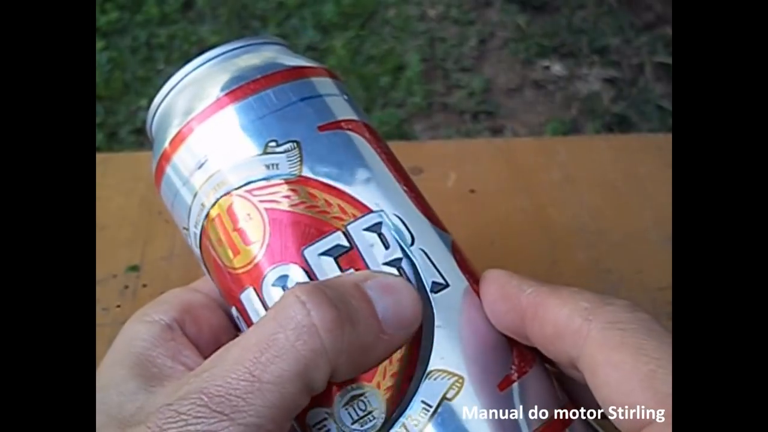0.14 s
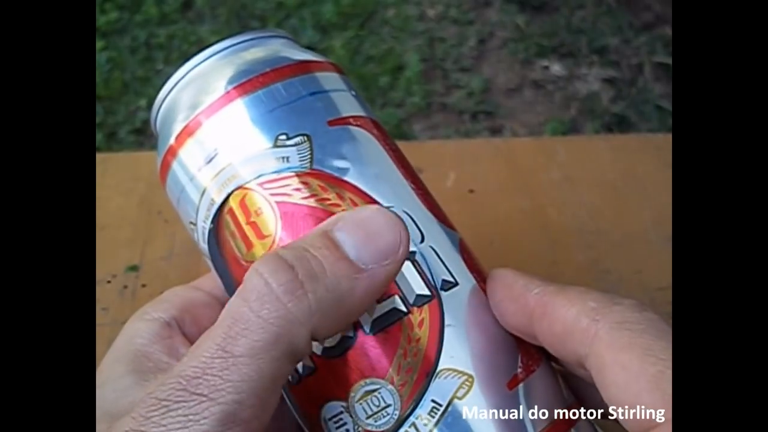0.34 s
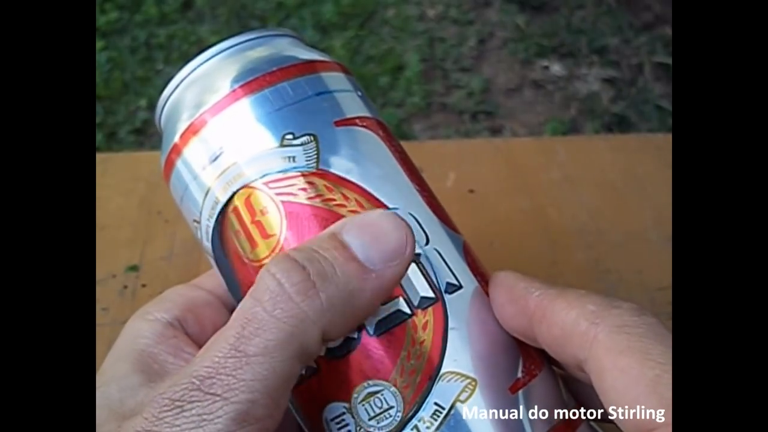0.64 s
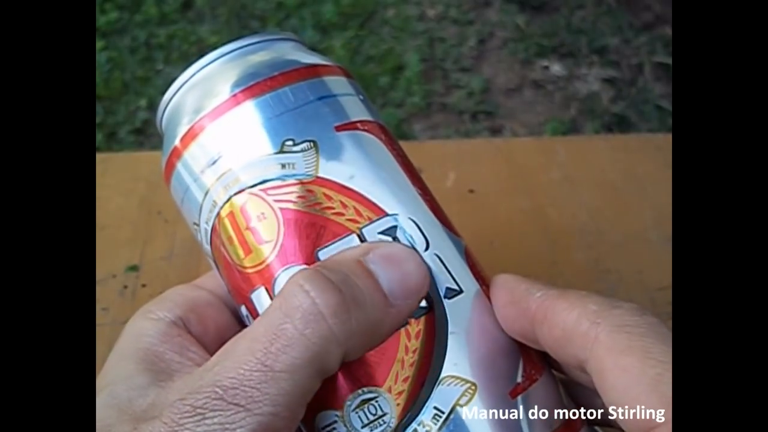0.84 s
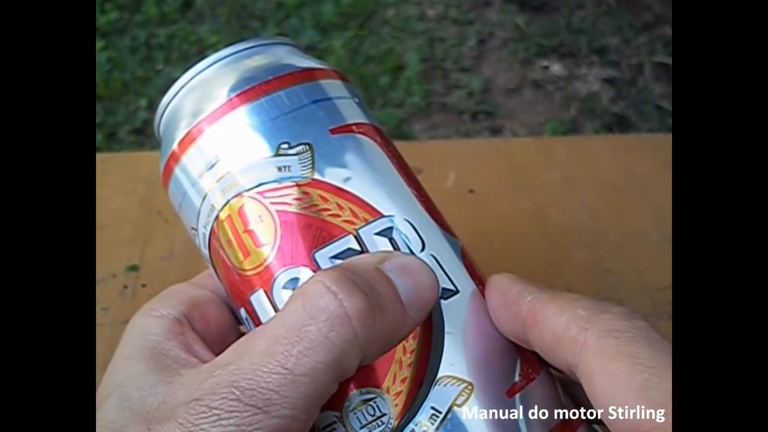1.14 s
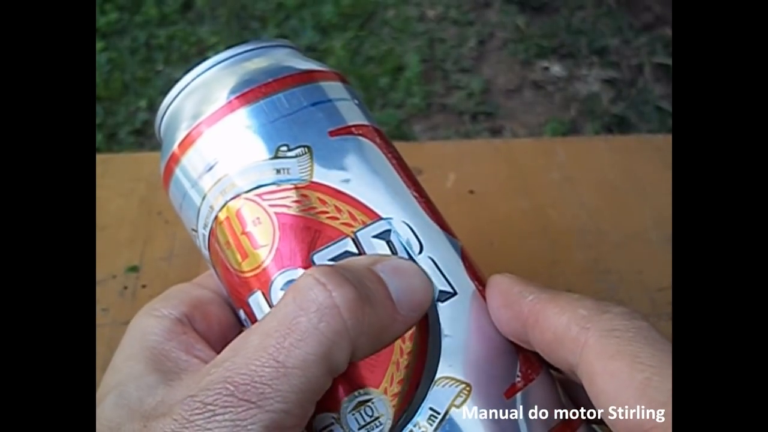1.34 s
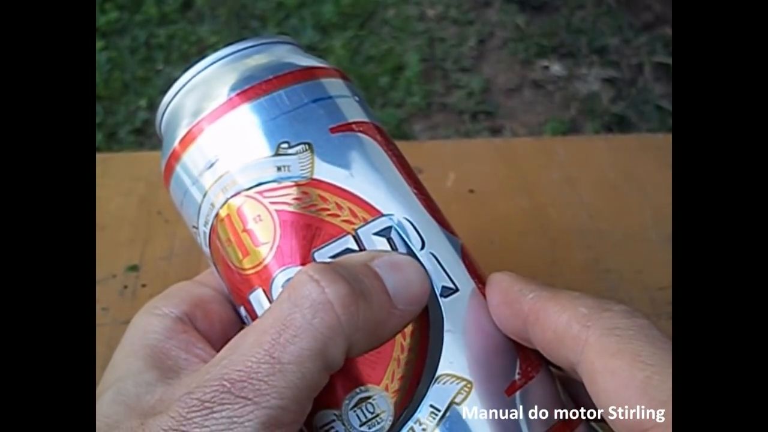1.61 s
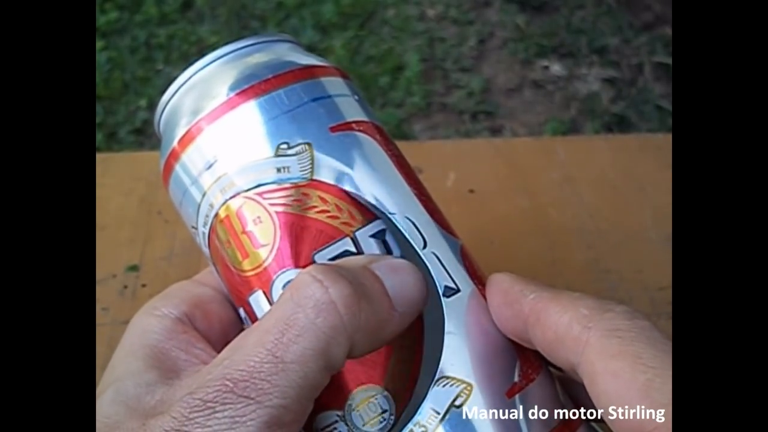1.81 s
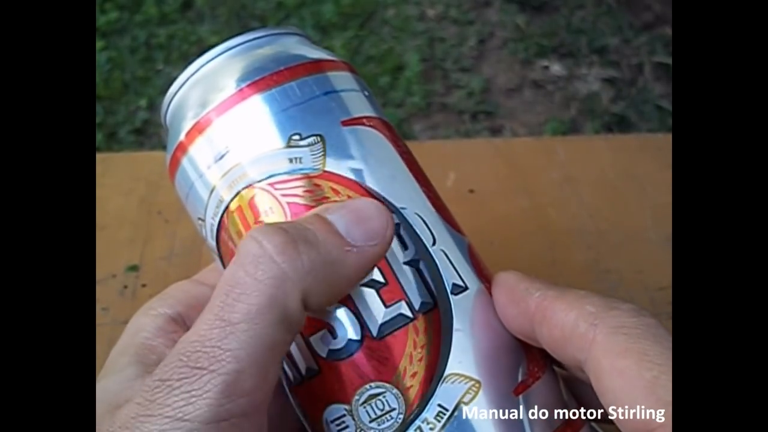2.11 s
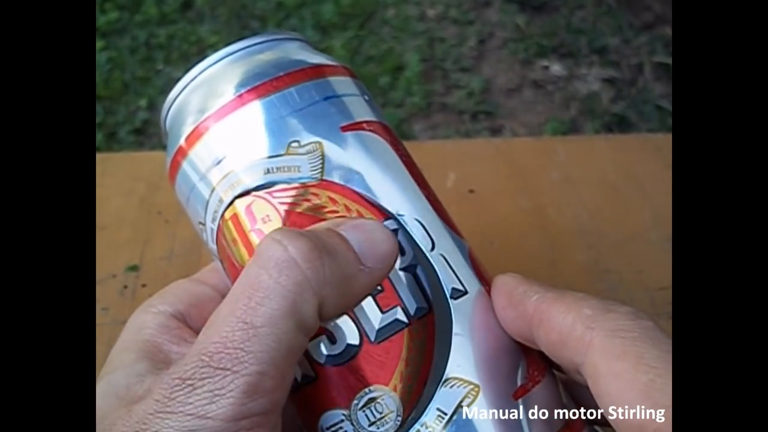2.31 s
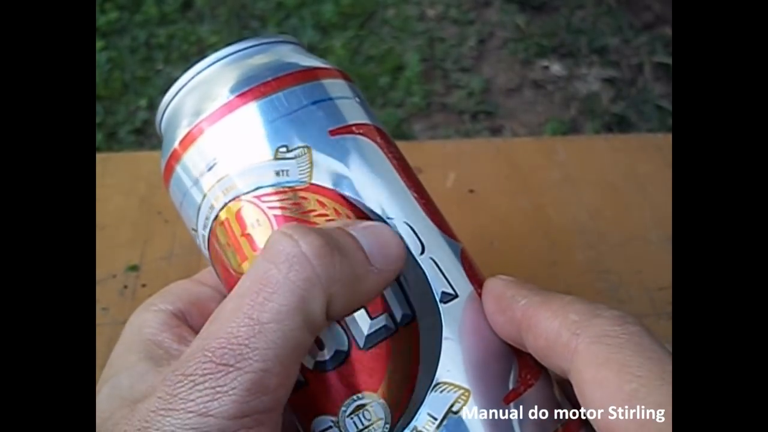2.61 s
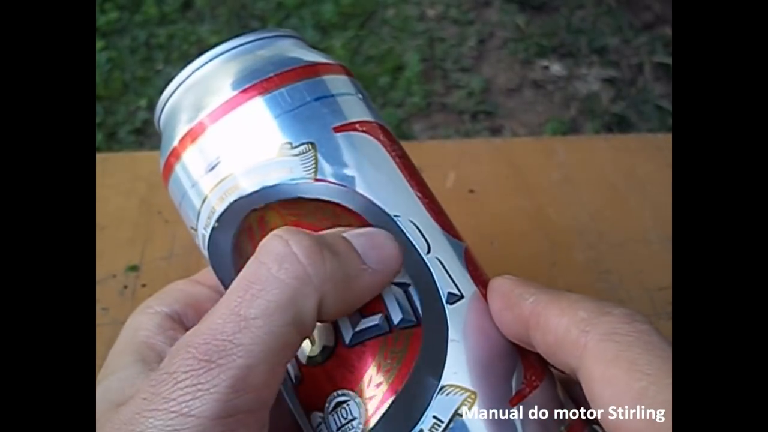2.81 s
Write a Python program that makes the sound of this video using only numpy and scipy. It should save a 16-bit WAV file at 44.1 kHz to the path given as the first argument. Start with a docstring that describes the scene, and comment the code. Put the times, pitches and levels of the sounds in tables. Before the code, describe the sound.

Empty aluminium can crackles and pops irregularly as thumbs flex its thin wall, close up outdoors

```python
"""Outdoors, close to a small camera, thumbs flex an empty aluminium can and push a cut disc out of its wall.
Dents pop through with a few sinking swings, creases snap and the cut edges scrape past each other.
All of these ring the can: separate fading tones for the wall and the air inside, noise for the thin sheet.
Fine crackle, soft rubbing skin and the ringing freed disc join in, with a faint echo.
Behind lie a low rumble, a faint hum and hiss. The narrow-band microphone overloads on the loudest hits."""
import sys
import numpy as np
from scipy import signal
from scipy.fft import rfft, irfft
from scipy.io import wavfile

SR = 44100
rng = np.random.default_rng(int(sys.argv[2]) if len(sys.argv) > 2 else 0)


def output_pcm(signal):
    """Save a mono or channel-first signal as 16-bit PCM at the path in sys.argv[1].

    Samples are clipped to [-1, 1] before scaling.
    """
    pcm = np.clip(np.atleast_2d(signal).T, -1, 1) * 32767
    wavfile.write(sys.argv[1], SR, np.round(pcm).astype(np.int16))


N = 130095  # length in samples
HIT_S = 0.01  # the level of a single hit is its power averaged over this many seconds


def amp(db):
    """Turns decibels into a gain."""
    return 10 ** (np.asarray(db) / 20)


def evened(x):
    """Scales a sound to an rms of 1."""
    return x / np.sqrt(np.mean(x ** 2) + 1e-20)


def read(points, hz):
    """Reads a curve of (Hz, value) points on a log-frequency axis."""
    f, value = np.transpose(points)
    return np.interp(np.log(hz + 1), np.log(f + 1), value)


def add(mix, s, sound):
    """Mixes a sound in at time s, cutting off what runs past the end."""
    part = mix[max(round(s * SR), 0):][:len(sound)]
    part += sound[:len(part)]


def noise(points):
    """Steady noise of rms 1, shaped to the given spectrum."""
    hz = np.fft.rfftfreq(N, 1 / SR)
    spectrum = rfft(rng.standard_normal(N)) * amp(read(points, hz))
    return evened(irfft(spectrum, N))


def drift(rate_hz):
    """Random wander of rms 1, kept mostly slower than rate_hz."""
    hz = np.fft.rfftfreq(N, 1 / SR)
    spectrum = rfft(rng.standard_normal(N)) * np.exp(-(hz / rate_hz) ** 2)
    return evened(irfft(spectrum, N))


def low_pass(x, hz, size):
    """Removes what lies above hz; a larger size cuts more steeply."""
    taps = signal.firwin(size, hz, window=("kaiser", 8), fs=SR)
    return np.apply_along_axis(signal.oaconvolve, -1, x, taps, "same")


# Borders in Hz between four neighbouring bands: bass, near 1 kHz, middle and treble.
BAND_EDGES = [250, 600, 1450, 2800, 5800]


def voiced(x, length, db, bass_db, middle_db, treble_db, size=8192):
    """Filters a sound to the wanted level in each band without any sound before its start."""
    z, hz = rfft(x, size), np.fft.rfftfreq(size, 1 / SR)
    bands = list(zip(BAND_EDGES, BAND_EDGES[1:]))
    centres = np.mean(bands, 1)
    wanted = db + np.array([bass_db, 0, middle_db, treble_db])
    gains = np.zeros(len(bands))
    for _ in range(2):  # the bands affect each other, so correct twice
        shaped = z * amp(read(list(zip(centres, gains)), hz))
        power = abs(shaped) ** 2 * 2 / (size * length * SR)
        levels = [10 * np.log10(power[(hz > lo) & (hz < hi)].sum() + 1e-20) for lo, hi in bands]
        gains = gains + wanted - levels
    # folding the cepstrum forward gives a filter that acts only after each impulse
    cepstrum = irfft(np.log(amp(read(list(zip(centres, gains)), hz))))
    cepstrum[1:size // 2] *= 2
    cepstrum[size // 2:] = 0
    return irfft(z * np.exp(rfft(cepstrum)))


def pressed(t, db_per_ms):
    """Extra decay under the thumb; negative damping counts as none."""
    return amp(-max(db_per_ms, 0) * t * 1000)


# Lowest strong resonance, rising as the disc lifts away. Each row: time in seconds, pitch in Hz.
CAVITY_HZ = [(0, 962), (2.62, 975.6), (2.76, 1159)]
# Ringing tones of the held can.
# Each row: pitch in Hz, strength in dB relative to the other tones, time to fade by 60 dB in seconds.
CAN_MODES = [(770, -15, .04), (1218, -2.5, 0.057), (1360, -9.5, 0.068), (1745, -7, .05), (1887, -3, 0.046),
             (2063, -5.5, 0.039), (2230, -9.5, 0.061), (2890, -7.5, 0.045), (3694, -9, 0.039),
             (4480, -10.5, 0.057), (5250, -7, 0.099), (5637, 3.5, 0.015)]
CAVITY_DB, CAVITY_T60_S = 2, 0.038
MODE_SPREAD_DB = 3  # each spot on the wall favours other modes
SHEET_DB, SHEET_T60_S = 3.5, 0.014  # dense, quickly damped modes of the thin sheet
TAIL_DB, TAIL_T60_S = -23, 0.1  # weaker, longer clatter that the thumb does not damp


def can_ring(s, damping=0, size=5000):
    """One impulse at time s rings separate modes over the clatter of the sheet; damping in dB/ms."""
    t = np.arange(size) / SR
    cavity = (np.interp(s, *np.transpose(CAVITY_HZ)), CAVITY_DB, CAVITY_T60_S)
    modes = np.zeros(size)
    for hz, db, t60 in [cavity, *CAN_MODES]:
        fade = amp(db + MODE_SPREAD_DB * rng.standard_normal() - 60 * t / t60)
        modes += fade * rng.choice([-1, 1]) * np.sin(2 * np.pi * hz * t)
    clatter = evened(low_pass(rng.standard_normal(size), 8000, size=31))
    sheet = clatter * amp(SHEET_DB - 60 * t / SHEET_T60_S)
    tail = clatter * amp(TAIL_DB - 60 * t / TAIL_T60_S)
    return (modes + sheet) * pressed(t, damping) + tail


# Dents flipping through.
# Each row: start in seconds, base level near 1 kHz in dB, middle and treble in dB relative to that,
# low, middle and high pitch in Hz at full swing, time to full swing in seconds.
POPS = [ (0.257, -32, 4.5, 3.5, 1024, 2030, 4470, 0.00071),
        (0.2676, -28.5, 7.5, -2.5, 1070, 1878, 2790, 0.00068),
        (.2738, -40.5, 4.5, -2, 1250, 1920, 2920, .0006),
        (0.2907, -32.5, 6.5, 1.5, 1170, 1700, 5200, .0008), (0.3076, -28, 5, -7, 1020, 1990, 2740, 0.001),
        (.597, -35, -6.5, -18.5, 1006, 1910, 3030, 0.0013),
        (0.6043, -36.5, -7.5, -18, 987, 2020, 3420, 0.0039),
        (0.9629, -31.5, -4, -15, 1067, 1876, 2820, 0.0012), (.97, -35, -6, -14, 986, 1780, 2850, 0.0028),
        (1.6242, -24, -3, -9.5, 1090, 1570, 3330, 0.00096), (1.911, -26.5, 4, 6, 914, 1820, 3480, 0.0011),
        (1.9134, -25.5, -5.5, 3.5, 1007, 2520, 4390, 0.003),
        (2.085, -18.5, -10.5, -9.5, 1006, 1930, 2620, 0.0013),
        (2.0902, -25.5, -15, -16, 1174, 1880, 4170, .0013),
        (2.3879, -34.5, -14.5, -26, 696, 1520, 3090, 0.0027), (2.39, -38, -11, -26, 990, 2020, 2810, 0.003),
        (2.605, -35, -13.5, -23, 967, 1766, 2950, 0.0039),
        (2.8422, -25.5, -5.5, -5.5, 1097, 2510, 3320, 0.003),
        (2.8511, -30, -16, -3, 1140, 2310, 3030, 0.00084), (2.861, -23, 0.5, -7, 1356, 2355, 3200, 0.0016),
        (2.8654, -25.5, 0.5, -11, 1150, 1540, 4600, 0.0024),
        (2.8858, -21, -2, -8.5, 1405, 1732, 4370, 0.0013), (2.8888, -28, 7.5, 7, 963, 2775, 3080, 0.0024),
        (2.8904, -20.5, -1.5, -2.5, 970, 1664, 3850, 0.0024)]
SWING_SHAPE, SAG_OCTAVES_PER_S = 1.4, 9  # each flip swells and dies while its pitch sinks
FLIP_DB, POP_CAN_DB = -6, -5  # shares of the flip and of the can's ring in one layer
POP_TOP_DB = -3.5  # weakens the flip's high pitch and lifts the ring's treble by as much
POP_DAMPING, POP_BASS_DB = 0.61, -16.5  # dB/ms; bass relative to the ring near 1 kHz


def pops():
    """A dent flips through: a few clean swings at three sinking pitches, which leave the can ringing."""
    out = np.zeros(N)
    for s, db, middle_db, treble_db, *pitches, swing_s in POPS:
        ring = can_ring(s, POP_DAMPING)
        t = np.arange(len(ring)) / SR
        swing = (t / swing_s * np.exp(1 - t / swing_s)) ** SWING_SHAPE
        phase = 2 * np.pi * np.cumsum(2 ** (-SAG_OCTAVES_PER_S * (t - swing_s))) / SR
        pitch_db = [0, middle_db, treble_db + POP_TOP_DB]
        flip = swing * sum(amp(level) * np.sin(hz * phase) for hz, level in zip(pitches, pitch_db))
        low_pitch_rms = np.sqrt(np.sum(swing ** 2) / (2 * HIT_S * SR))
        add(out, s, amp(db + FLIP_DB) * flip / low_pitch_rms)
        ring = voiced(ring, HIT_S, db + POP_CAN_DB, POP_BASS_DB, middle_db, treble_db - POP_TOP_DB)
        add(out, s, ring)
    return out


# Creases snapping.
# Each row: start in seconds, level near 1 kHz in dB, middle and treble in dB relative to that,
# pitch of the buckling patch in Hz, thumb damping in dB per millisecond (below zero means none).
SNAPS = [ (.046, -51.5, -8.5, -24, 1050, 9), (0.076, -52.5, 1, -4.5, 1940, -1.5),
         (0.09, -43, -9, -8, 973, -0.5), (.176, -59.5, 5.5, 3, 980, 0), (0.21, -41.5, -3, -12.5, 1020, 0),
         (.2495, -41.5, 9.5, -2, 2050, 0), (.281, -44, 6, 0, 1950, 4), (0.285, -40.5, 1.5, -1, 1400, 3.5),
         (0.2885, -38, 5, -3.5, 1900, 3.5), (.3, -39.5, 6.5, -8.5, 1908, -3.5),
         (.3172, -48, 6, -9.5, 2000, 4), (.404, -54.5, 6.5, -10.5, 1870, -0.5),
         (0.409, -49, -5.5, -10.5, 1100, -2), (0.444, -56, -0.5, -3.5, 910, 0),
         (.6035, -37.5, 2.5, -3.5, 1840, 0), (0.8232, -43, 1, -9.5, 2000, 0.5),
         (.829, -48.5, -3.5, -11.5, 1000, 10), (0.9466, -50.5, -2, -6, 1110, -4.5),
         (1.5773, -41.5, 14, 13, 2010, 1.5), (1.5851, -38, 11, 4.5, 1995, 0.3),
         (1.6199, -40.5, 5.5, 6, 2300, 3), (1.9429, -33.5, 5.5, 1.5, 1970, 1),
         (1.9506, -30.5, -3, 0.5, 940, 0), (1.954, -30, -0.5, 0.5, 1790, 1.5),
         (1.9575, -32, 3.5, 2, 1823, 2.5), (1.961, -29.5, -1.5, 3, 987, 7.5),
         (1.9638, -32, -2.5, 1, 1096, 3.5), (2.3, -52, 0, -5.5, 2010, -0.5),
         (2.332, -49.5, 4.5, -8.5, 1877, 3.5), (2.337, -46, 3, -6, 1845, 0.2),
         (2.414, -46.5, -3, -11, 1900, .4), (2.616, -40, -6.5, -16, 983, 1.5),
         (2.667, -54, 4.5, 4, 2240, -1), (2.702, -49, -5, -9, 1000, -6), (2.724, -54.5, 8, 1, 2000, 1.5),
         (2.7773, -37, -4, -11, 1150, -1.5), (2.8488, -36.5, 3, -2.5, 1200, 3),
         (2.878, -27, 2, -6, 1950, 2)]
PATCH_DB, PATCH_T60_S = 8.5, 0.027
SNAP_BASS_DB = -18  # relative to the ring near 1 kHz


def snaps():
    """A crease gives way at once, twangs at its own pitch and rings the can."""
    out = np.zeros(N)
    for s, db, middle_db, treble_db, hz, damping in SNAPS:
        ring = can_ring(s, damping)
        t = np.arange(len(ring)) / SR
        fade = amp(PATCH_DB - 60 * t / PATCH_T60_S) * pressed(t, damping)
        patch = fade * np.sin(2 * np.pi * hz * t)
        add(out, s, voiced(ring + patch, HIT_S, db, SNAP_BASS_DB, middle_db, treble_db))
    return out


# Cut edges scraping.
# Each row: start in seconds, length in seconds, level near 1 kHz in dB,
# then bass, middle and treble in dB relative to that.
SCRAPES = [(.06, 0.033, -54.5, 1, -5.5, -4.5), (0.246, 0.016, -40, -8.5, 7.5, 4),
           (0.267, 0.02, -43.5, -12, 6.5, 2.5), (0.317, 0.0093, -47, -20, -4, -3),
           (0.856, 0.016, -54, -13, -5, -5.5), (1.61, 0.0068, -42.5, -4, 7, -10),
           (1.9394, 0.014, -35.5, -20.5, 3.5, 2.5), (1.952, 0.013, -34, -21, 3.5, 4),
           (2.162, 0.014, -56.5, -13, 5, 0.5), (2.572, 0.054, -54, -9.5, -5.5, -21.5),
           (2.839, 0.018, -30.5, -37, 2, -1), (2.866, 0.013, -28.5, -22, 1, -2.5)]
SLIPS_PER_S, SLIP_SPREAD_DB = 1400, 4
SCRAPE_DAMPING = 0.83  # dB/ms


def scrapes():
    """The cut edges stick and slip in a dense run of tiny impulses, each ringing the can."""
    out = np.zeros(N)
    for s, length, *levels in SCRAPES:
        count = max(round(length * SR), 2)
        happens = rng.random(count) < SLIPS_PER_S / SR
        strength = amp(SLIP_SPREAD_DB * rng.standard_normal(count))
        slips = happens * strength * rng.choice([-1, 1], count)
        slips[0] = 1  # every scrape starts with a slip
        ringing = signal.fftconvolve(slips, can_ring(s, SCRAPE_DAMPING))
        add(out, s, voiced(ringing, length, *levels))
    return out


# Spells of fine crackle under the thumbs. Each row: start in seconds, end in seconds.
FLEXING = [(.02, .11), (0.409, .48), (.82, .88), (2.389, 2.44), (2.571, 2.8)]
CRACKLE_PER_S, CRACKLE_DB, CRACKLE_SPREAD_DB = 130, -66, 4.5


def crackle():
    """Very small ticks at random moments ring the can while the wall is under strain."""
    out = np.zeros(N)
    for start, end in FLEXING:
        count = max(round((end - start) * CRACKLE_PER_S), 0)
        for s in rng.uniform(start, end, count):
            ring = can_ring(s)
            level = amp(CRACKLE_DB + CRACKLE_SPREAD_DB * rng.uniform(-0.93, 1))
            add(out, s, ring / np.sqrt(np.sum(ring ** 2) / (HIT_S * SR)) * level)
    return out


# Skin sliding on the wall.
# Each row: start in seconds, length in seconds, level in dB before the swell, centre pitch in Hz.
RUBS = [(0.419, .06, -59.5, 2900), (0.709, .11, -61.5, 1500), (1.221, 0.18, -62, 1500),
        (1.73, 0.045, -65, 3300), (2.558, 0.22, -67, 1700)]
RUB_GRAIN_DB, RUB_WIDTH_OCTAVES = 3, 0.34


def rubs():
    """Skin slides softly over the painted metal: grainy noise around one pitch swells and fades."""
    out, hz = np.zeros(N), np.fft.rfftfreq(N, 1 / SR)
    for s, length, db, centre_hz in RUBS:
        grains = rng.standard_normal(N) * amp(RUB_GRAIN_DB * drift(150))
        octaves = np.log2((hz + 1) / centre_hz)
        band = np.exp(-.5 * (octaves / RUB_WIDTH_OCTAVES) ** 2)
        rub = evened(irfft(rfft(grains) * band, N))
        count = max(round(length * SR), 2)
        swell = np.sin(np.linspace(0, np.pi, count))
        add(out, s, amp(db) * rub[:count] * swell)
    return out


# Ringing tones of the disc once it springs free.
# Each row: pitch in Hz, starting peak level in dB, time to fade by 60 dB in seconds.
DISC_MODES = [(809, -41, 0.4), (936, -33, 0.12), (950, -49, .08), (1195, -33.5, 0.15), (1410, -33, 0.13),
              (1830, -32, 0.18), (2560, -52, 0.087), (3090, -35, .1), (3840, -40, 0.11), (4000, -33, 0.087),
              (4320, -39, 0.33)]
FREED_S = 2.890
SHIMMER_DB, SHIMMER_T60_S = -28.5, 0.23


def freed_disc():
    """The loose disc rings in fading tones under a fading shimmer of noise."""
    out, t = np.zeros(N), np.arange(SR // 4) / SR
    ring = np.zeros(len(t))
    for hz, db, t60 in DISC_MODES:
        ring += amp(db - 60 * t / t60) * np.sin(2 * np.pi * (hz * t + rng.random()))
    shimmer = rng.standard_normal(len(t)) * amp(SHIMMER_DB - 60 * t / SHIMMER_T60_S)
    add(out, FREED_S, ring + shimmer)
    return out


ECHO_DB, ECHO_T60_S = -32.5, 0.22  # faint return from table and yard


def echo(x):
    """A faint, short outdoor tail: the sound smeared by fading noise."""
    t = np.arange(SR // 2) / SR
    tail = rng.standard_normal(len(t)) * amp(-60 * t / ECHO_T60_S)
    return amp(ECHO_DB) * signal.fftconvolve(x, tail / np.linalg.norm(tail))[:N]


# Spectrum of the distant rumble. Each row: pitch in Hz, relative strength in dB per Hz.
RUMBLE = [(10, -14.5), (24, -1.5), (44, 0.5), (56, -7.5), (70, -1.5), (96, -10.5), (112, -11.5), (130, -11),
          (175, -14), (200, -22), (300, -33.5), (600, -72.5)]
# Tones of the hum. Each row: average pitch in Hz, level in dB before the swells below.
HUM = [(44, -51), (113, -59), (150, -46.5)]
# Spectrum of the soft hiss. Each row: pitch in Hz, relative strength in dB per Hz.
AIR = [(100, -5), (250, 1), (450, -4), (800, -6), (1300, -10), (1900, -11.5), (2400, -14), (4000, -17.5),
       (5700, -16.5)]
# Gain of the whole background, which dips briefly. Each row: time in seconds, gain in dB.
BACKGROUND = [(0, 2), (0.259, 2.5), (.33, -9), (.4, -3.5), (0.521, 2.5), (1.601, 1.5), (2.2, 2), (2.9, 2.5)]
# levels before the background gain; swells and wander are rms sizes
RUMBLE_DB, RUMBLE_SWELL_DB, AIR_DB = -39.5, 1, -58
HUM_WANDER_HZ, HUM_SWELL_DB = 1.194, 1.5


def background():
    """Shaped noise makes distant rumble and soft hiss; wavering sine tones make the hum."""
    hum = np.zeros(N)
    for hz, db in HUM:
        level = amp(db + HUM_SWELL_DB * drift(7)) * np.sqrt(2)
        phase = 2 * np.pi * np.cumsum(hz + HUM_WANDER_HZ * drift(2.8)) / SR
        hum += level * np.sin(phase)
    rumble = amp(RUMBLE_DB + RUMBLE_SWELL_DB * drift(2.1)) * noise(RUMBLE)
    hiss = amp(AIR_DB) * noise(AIR)
    gain = amp(np.interp(np.arange(N) / SR, *np.transpose(BACKGROUND)))
    return (hum + rumble + hiss) * gain


def scene():
    """The can in front of the background, alike in both channels."""
    # two layers of pops: equal flips double, while each layer rings the can differently
    dents = pops() + pops()
    can = dents + snaps() + scrapes() + crackle() + rubs() + freed_disc()
    return np.tile(can + echo(can) + background(), (2, 1))


CLIP_LEVEL = 0.58  # ceiling of the overload, as a share of full scale
MIC_EDGE_HZ, EDGE_HZ = 5680, 15700  # where the treble starts to fall, and the final cut-off
MIC_FALL_DB_PER_KHZ, MIC_SKIRT_DB, MIC_SKIRT_DB_PER_KHZ = 67.5, -12, 16  # steep fall, then gentler skirt
LEFT_LAG_S = 83e-6


def record(dry):
    """A narrow-band microphone that overloads; the left channel runs slightly late."""
    hz = np.fft.rfftfreq(N, 1 / SR)
    over_khz = np.maximum(hz - MIC_EDGE_HZ, 0) / 1000
    fall = amp(-MIC_FALL_DB_PER_KHZ * over_khz)
    skirt = amp(MIC_SKIRT_DB - MIC_SKIRT_DB_PER_KHZ * over_khz)
    narrow = irfft(rfft(dry) * np.maximum(fall, skirt), N)
    # the 4 also turns quiet sounds down by about 1.2 dB
    clipped = narrow / (4 + (narrow / CLIP_LEVEL) ** 10) ** (1 / 10)
    late = irfft(rfft(clipped[0]) * np.exp(-2j * np.pi * hz * LEFT_LAG_S), N)
    return low_pass(np.array([late, clipped[1]]), EDGE_HZ, size=511)


dry = scene()
out = record(dry)
output_pcm(out)
```